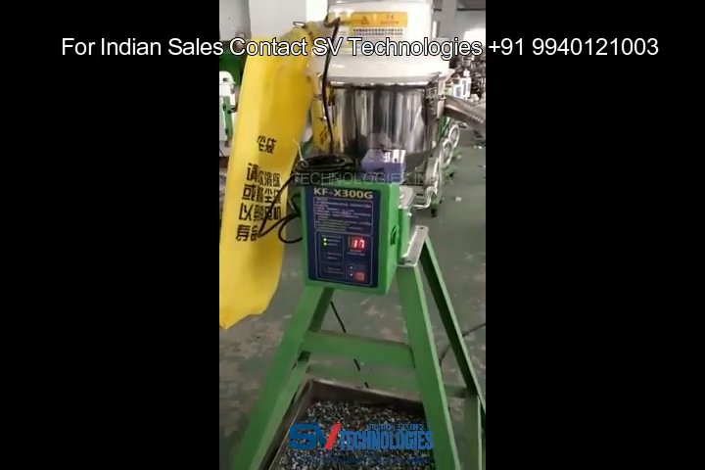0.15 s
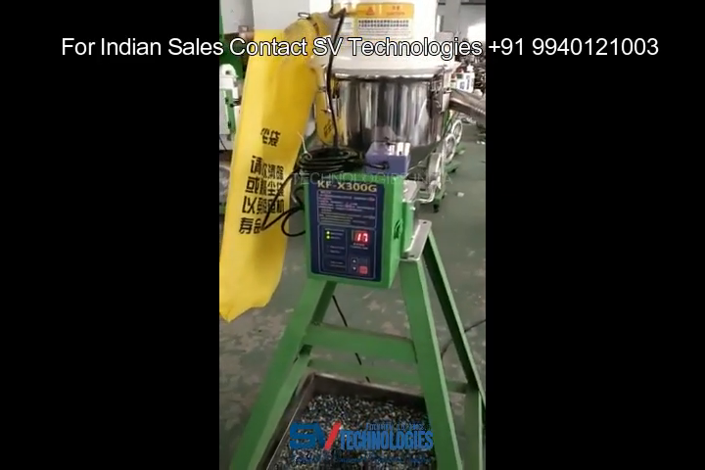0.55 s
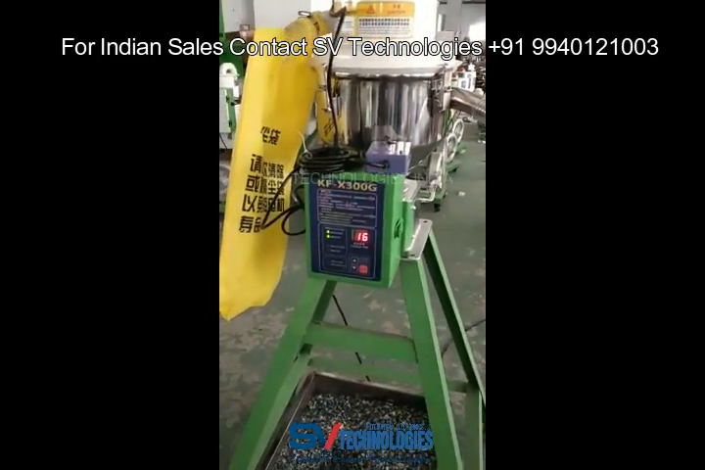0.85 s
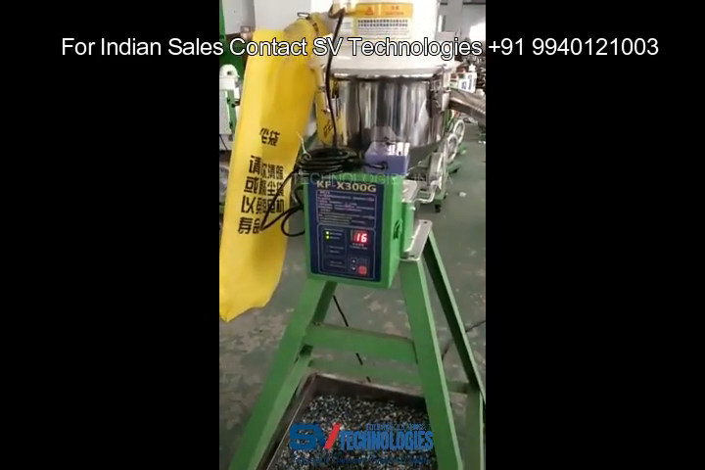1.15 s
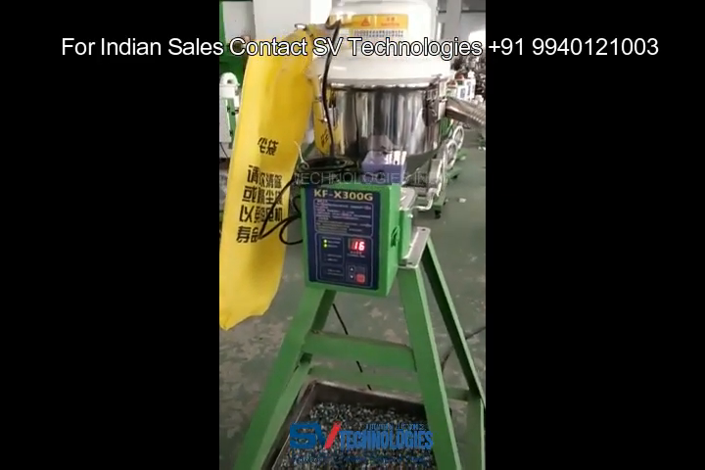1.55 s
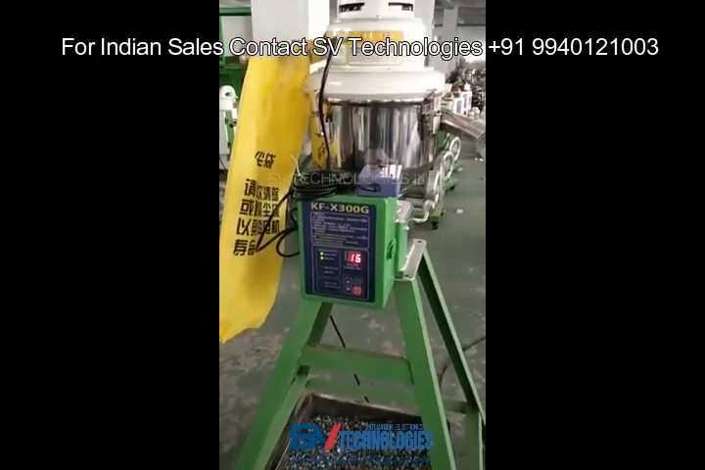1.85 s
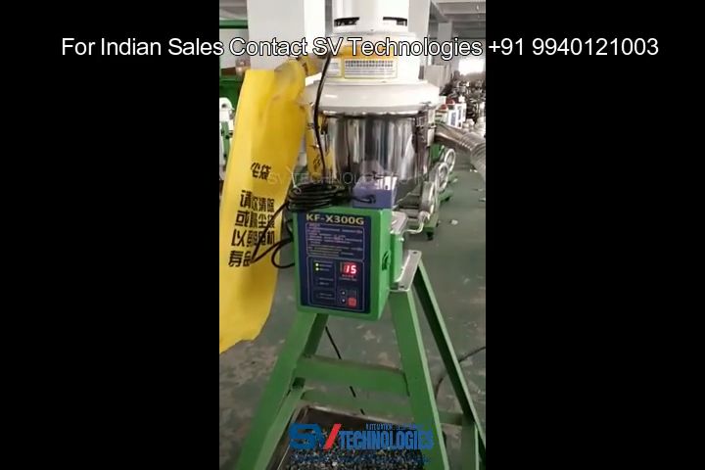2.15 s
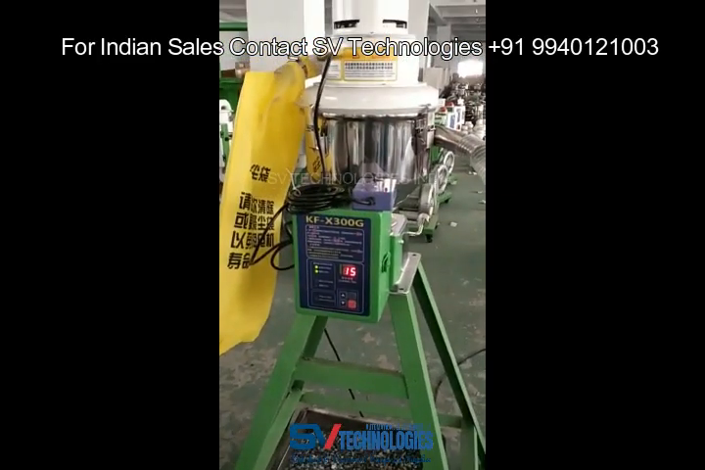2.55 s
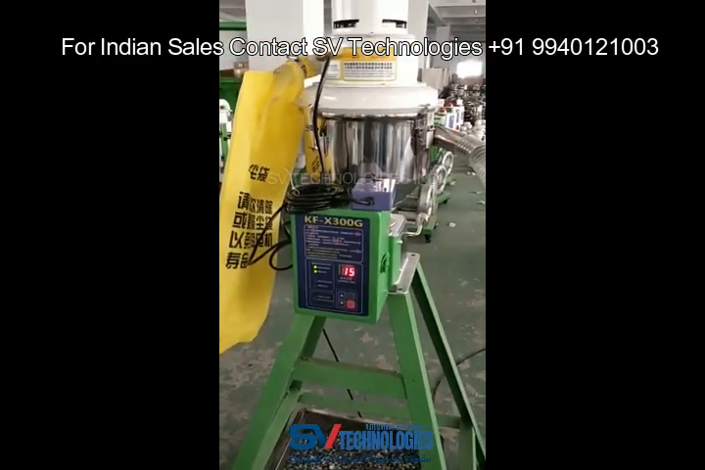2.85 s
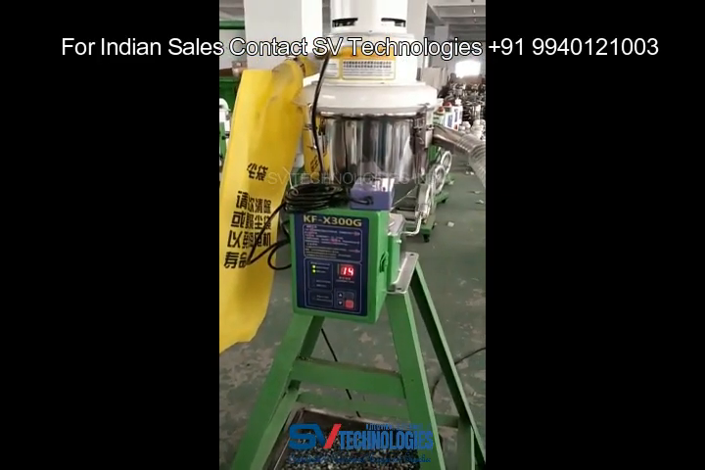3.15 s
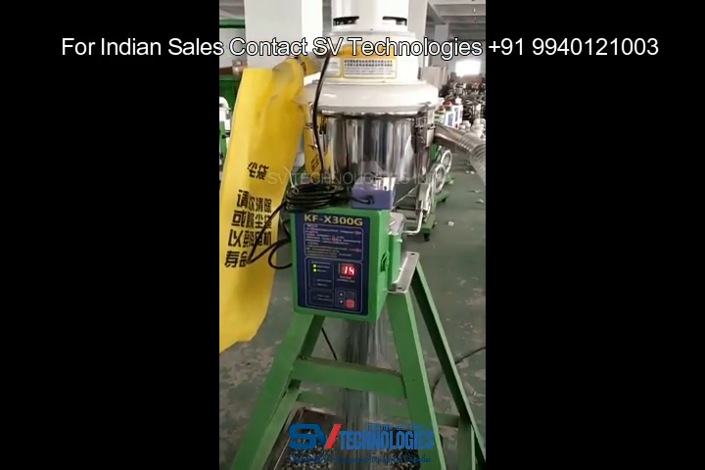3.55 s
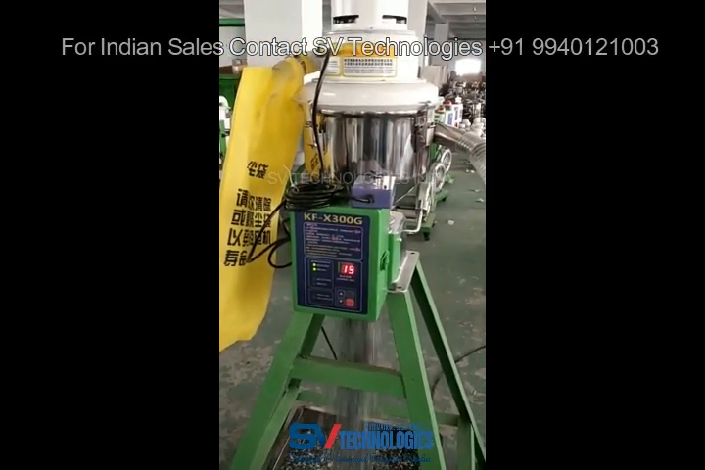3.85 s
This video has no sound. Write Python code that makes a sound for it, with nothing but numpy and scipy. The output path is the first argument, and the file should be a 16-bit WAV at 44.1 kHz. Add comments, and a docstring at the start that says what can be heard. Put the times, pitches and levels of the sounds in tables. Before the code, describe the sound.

Loud suction motor coasts to a stop, followed by a sudden clattering rush of plastic pellets

```python
"""The brushed motor of a vacuum loader coasts down in a factory hall, heard by two spaced phone microphones.
From the start, fan noise fades while sinusoids locked to the shaft, a tone and a slot whine, fall in pitch. At
3.3 s, with the suction gone, the flap opens and plastic granules pour into a bin below: random impacts excite
its resonances, and hard knocks join them from 3.7 s. Filtered noise gives the hall's steady murmur, hum and
faint whistle throughout, and a low rumble swells beneath them."""
import sys
import numpy as np
from scipy import signal
from scipy.fft import rfft, irfft, next_fast_len
from scipy.io import wavfile
from scipy.ndimage import map_coordinates

SR = 44100
rng = np.random.default_rng(int(sys.argv[2]) if len(sys.argv) > 2 else 0)


def boost(x):
    """Linear amplitude factor 10**(x/20) for a level x in decibels (scalar or array-like)."""
    u = np.asarray(x, float) / 20
    return 10 ** u


def dump_mix(stems):
    """Bounce the given channels to the path in sys.argv[1] as a 16-bit WAV at rate SR."""
    frames = np.atleast_2d(stems).T  # one column per channel
    limited = np.clip(frames, -1, 1)  # hard clip at full scale
    pcm = np.round(limited * 32767).astype(np.int16)
    wavfile.write(sys.argv[1], SR, pcm)


N = 176400  # samples
SIZE = next_fast_len(N + SR)
HZ = np.maximum(np.arange(SIZE // 2 + 1) * SR / SIZE, 1)
TIME = np.arange(N) / SR

# Coasting shaft: initial turns per s; drag = friction + viscous * speed + air * speed^2
START_HZ, FRICTION, VISCOUS, AIR = 180.34, 20.08, .0854, .0020465
SLOTS = 22  # per shaft turn
FLICKER_DB, TONE_ROOM_DB = 3, -11
MOTOR_LAG_S = 0.0002  # left after right

# Shaft tone, shaking the frame while it passes the frame's resonance: (time [s], level [dB])
SHAFT_LEVEL = [(0, -43), (.05, -34), (.23, -41.5), (.37, -51.5), (.6, -64), (1, -71), (4, -107)]
# Slot whine: (time [s], level [dB])
WHINE_LEVEL = [(0, -50), (.17, -43), (.3, -52), (.4, -48), (.55, -51), (.65, -46), (.82, -43), (.97, -44),
               (1.04, -48), (1.11, -39), (1.2, -43), (1.24, -50), (1.33, -43), (1.42, -48), (1.48, -40),
               (1.55, -45), (1.62, -54), (2.0, -59), (2.2, -62), (2.65, -65), (2.82, -78), (2.92, -51),
               (2.99, -50), (3.07, -63), (3.22, -53), (3.4, -64), (3.5, -85), (4, -90)]
# Overtones of the whine: (multiple of the slot rate)
OVERTONE_RATIOS = [1.5, 2, 3, 4]
# Their mean levels: (time [s], level [dB] at 1.5, 2, 3 and 4 times the slot rate)
OVERTONE_LEVELS = [(0, -66, -60, -75, -85), (.65, -70, -60, -75, -85), (.82, -70, -55, -70, -85),
                   (1.0, -72, -62, -63, -80), (1.4, -72, -68, -64, -76), (1.55, -72, -66, -57, -76),
                   (1.7, -70, -66, -60, -74), (1.85, -56, -64, -66, -63), (2.02, -59, -55, -68, -70),
                   (2.2, -62, -60, -69, -62), (2.32, -76, -56, -64, -74), (2.75, -76, -59, -67, -72),
                   (2.9, -76, -68, -64, -72), (2.99, -78, -60, -47, -70), (3.08, -78, -61, -54, -61),
                   (3.16, -80, -72, -68, -66), (4, -85, -80, -78, -80)]
# Nearby reflections turn the phase of the tones between the microphones: (frequency [Hz], left lead [rad])
TONE_PHASE = [(1500, 0), (1800, .9), (1930, .7), (2000, 3.2), (2080, 3), (2200, .9), (2450, 1), (2600, -1),
              (3000, -1), (3350, -1.5), (3700, -1.3), (4500, 0)]

# Fan roar before its puffs, flicker and change of colour: (time [s], level [dB])
ROAR_LEVEL = [(0.0, -25.5), (0.02, -28), (1.24, -41), (1.37, -42.5), (1.41, -42.5), (1.48, -44),
              (1.53, -43), (2.51, -51.5), (3.03, -51), (3.25, -49)]
# Colour of the roar at full speed: (frequency [Hz], relative density [dB per Hz])
ROAR_SPECTRUM = [(120, -17.5), (200, -7), (333, -9.5), (469, -13), (768, -1.7), (1010, -9), (1570, -1),
                 (2410, -4), (2710, -2.5), (4440, -4), (5500, -2.5), (6360, 1.5), (7500, -5), (8000, -16),
                 (9500, -17), (10800, -19), (11700, -38), (15300, -60), (22000, -120)]
# Loss of the roar per halving of speed, negative for gain: (frequency [Hz], loss [dB])
ROAR_SPEED_LOSS = [(200, -3), (800, -2.5), (2500, 1.66), (5000, 2), (7000, 5.5), (11000, 3.5)]
# Brief puffs in the roar, full from 6 kHz up and weaker below: (time [s], level [dB] above the roar)
ROAR_PUFFS = [(.87, 6), (.98, 0.5), (1.6, 0.5), (2.92, 10.5), (3.22, 7)]
PUFF_S = 0.017  # from the peak to 1/e of its rise in dB
ROAR_PATCHY_DB, ROAR_DIFFUSE, ROAR_ROOM_DB = 3, 0.26, 0.5  # diffuse: share of power

# Granule stream: (time [s], level [dB], weight of the sound below BIN_LOW_HZ [dB] relative to its mean)
POUR_LEVEL = [(3.3, -51, -11), (3.32, -52, -22), (3.355, -39, -15), (3.4, -25, -15), (3.42, -25.5, -20),
              (3.43, -28.5, -22.5), (3.55, -32, -15.5), (3.6, -28, -14.5), (3.65, -27.5, -20.5),
              (3.7, -25, -16), (3.76, -23, -21), (3.8, -27.5, -20.5), (3.82, -26, -11.5), (3.845, -28, -21),
              (3.87, -30.5, -34), (3.92, -27, -10), (3.96, -27, -17.5), (4.0, -28, -16)]
# Clumps landing as short bursts: (time [s], peak level [dB] before the offset LUMP_DB)
LUMP_PEAKS = [(3.3227, -19.5), (3.3553, -17.5), (3.6026, -16), (3.65, -19.5), (3.814, -19.5),
              (3.9206, -18.5)]
# Short hard hits on the bin: (time [s], peak level [dB] before the offset KNOCK_DB)
KNOCK_PEAKS = [(3.7242, -16), (3.7266, -16), (3.7374, -22), (3.7449, -13), (3.766, -15), (3.7897, -24),
               (3.796, -15.5), (3.809, -21), (3.8235, -23), (3.8749, -8.5), (3.898, -19.5), (3.9056, -20)]
LUMP_S, LUMP_DB, KNOCK_S, KNOCK_DB = 0.009, -11, .0015, -2  # decay times and level offsets
# Colour of the grain impacts: (frequency [Hz], relative density [dB per Hz])
GRAIN_SPECTRUM = [(410, -45), (900, -24), (1150, -11), (1500, -6), (1750, -7), (1950, -8), (2700, -6),
                  (3200, -11), (3650, -3), (4700, -4), (5520, -9), (6300, -6), (7300, -6), (8340, -15),
                  (10400, -14), (11700, -33), (15300, -58), (22000, -120)]
# Resonances of the bin: (frequency [Hz], width [Hz], relative level [dB])
BIN_MODES = [(1560, 90, -6), (1930, 40, -5), (2260, 80, 4.5), (2900, 370, -4.5), (3560, 130, -4),
             (3780, 90, -6), (3950, 80, -6), (4250, 120, -3), (4690, 150, 0), (5140, 120, -17),
             (6020, 330, -10.5), (7000, 200, -14)]
# Low tones bend round the phone, which turns their phase: (frequency [Hz], left lead [rad])
PHONE_BEND = [(600, -0.78), (800, -0.12), (1120, 0.2), (1500, 1), (2000, -0.26)]
GRAINS_PER_S, GRAIN_SPREAD_DB, CLUMP_DB = 4000, 2.8, 1.2
BIN_DB, BIN_LOW_HZ, RING_WANDER_DB = 1.5, 2700, 2.5  # ring over ticks, crossover, wander of each mode
POUR_LAG_S, POUR_LAG_SPREAD_S, POUR_ROOM_DB = -0.0003, .00003, -10  # right after left

# Colour of the steady hall noise: (frequency [Hz], relative density [dB per Hz])
HALL_SPECTRUM = [(15, -56), (40, -32), (65, -6.5), (150, -7), (458, -19), (828, -24), (2150, -12),
                 (2570, -10), (3880, -22), (5150, -15), (7600, -24), (8100, -36), (10800, -40.5),
                 (11700, -90), (15300, -81), (22000, -120)]
# Breathy whistle: (time [s], level [dB])
WHISTLE_LEVEL = [(0, -62), (1.3, -58), (1.6, -54), (2.3, -56), (3, -60), (4, -66)]
# Rumble: (time [s], level [dB])
RUMBLE_LEVEL = [(0, -84), (1, -79), (2, -72), (2.7, -69), (4, -63)]
HALL_DB, HUM_DB, HUM_HZ, HUM_WIDTH_HZ = -52.5, -58, 67.1, 12.5
WHISTLE_HZ, WHISTLE_WIDTH_HZ, RUMBLE_HZ, RUMBLE_WIDTH_HZ = 5140, 200, 47.3, 30
ROOM_T60_S, ALIKE_BELOW_HZ = .4, 440
# Unequal microphones, the right one duller: (frequency [Hz], left minus right [dB])
MICROPHONE_DIFFERENCE = [(60, 1), (430, -0.3), (900, -2), (1600, -0.8), (3000, 0.3), (5000, 2),
                         (6500, -0.5), (7500, 8), (9000, 8), (11500, 9)]


def rms_one(x):
    """Normalisation to unit rms."""
    return x / np.sqrt(np.mean(x ** 2) + 1e-20)


def in_time(rows):
    """Linear interpolation of each table column over time."""
    s, *columns = np.transpose(rows)
    return [np.interp(TIME, s, c) for c in columns]


def at_hz(points, hz):
    """Interpolation of a spectrum on a logarithmic frequency axis."""
    points = np.array(points)
    return np.interp(np.log(hz), np.log(points[:, 0]), points[:, 1])


def shaped(x, gain):
    """Linear filtering: the spectrum is multiplied by a gain per frequency."""
    return irfft(rfft(x, SIZE) * gain, SIZE)[..., :N]


def drift(rate):
    """Slow random modulation: a cubic spline through normal draws, 2 * rate of them per second."""
    knots = rng.standard_normal(400)
    return map_coordinates(knots, [TIME * rate * 2 + 2], order=3)


def resonance(x, hz, width_hz):
    """Damped resonance: a two-pole filter of about unit gain at its peak."""
    r = np.exp(-np.pi * width_hz / SR)
    poles = [1, -2 * r * np.cos(2 * np.pi * hz / SR), r * r]
    return signal.lfilter([(1 - r * r) / 2, 0, (r * r - 1) / 2], poles, x)


def decay(start_s, fall_s):
    """Exponential decay from a sudden onset."""
    return np.exp(-np.maximum(TIME - start_s, 0) / fall_s) * (TIME >= start_s)


def between_ears(phase):
    """Interaural phase: half the turn as lead on the left, half as lag on the right."""
    return np.exp(np.array([[.5j], [-.5j]]) * phase)


def unalike(pair):
    """Spatial coherence of a diffuse field: shared bass, independent treble."""
    low = 1 / (1 + (HZ / ALIKE_BELOW_HZ) ** 4)
    mid, side = shaped(pair, np.sqrt([1 + low, 1 - low]) / np.sqrt(2))
    return np.array([mid + side, mid - side])


def placed(x, lag_s, room_db):
    """Arrival-time difference of the direct sound, plus an exponentially decaying reverberant tail."""
    decaying = boost(-60 * TIME / ROOM_T60_S) * (TIME > .004)
    tail = unalike(rng.standard_normal((2, N)) * decaying)
    tail = boost(room_db) * tail / np.sqrt((tail ** 2).sum(1).mean())
    direct = np.exp(-1j * np.pi * HZ * lag_s * np.array([[1], [-1]]))
    return shaped(x, (direct + rfft(tail, SIZE)) / np.sqrt(1 + boost(2 * room_db)))


def speed():
    """Rotational deceleration: turns per second, the closed solution for quadratic drag."""
    d = np.sqrt(4 * FRICTION * AIR - VISCOUS ** 2)
    start_angle = np.arctan((2 * AIR * START_HZ + VISCOUS) / d)
    return (d * np.tan(start_angle - d * TIME / 2) - VISCOUS) / (2 * AIR)


def tones(turns):
    """Phase locking to rotation: shaft tone, slot whine and its flickering overtones."""
    angle = 2 * np.pi * np.cumsum(turns) / SR
    shaft = boost(in_time(SHAFT_LEVEL)[0]) * np.sin(angle)
    whine = boost(in_time(WHINE_LEVEL)[0]) * np.sin(SLOTS * angle)
    upper = 0
    for ratio, db in zip(OVERTONE_RATIOS, in_time(OVERTONE_LEVELS)):
        upper = upper + boost(db + FLICKER_DB * drift(12)) * np.sin(ratio * SLOTS * angle)
    return np.sqrt(2) * (shaft + whine + upper)  # levels are rms


def roar(turns):
    """Broadband flow noise, direct and diffuse: its bands flicker and change balance as the fan slows."""
    direct = placed(rng.standard_normal(N), MOTOR_LAG_S, ROAR_ROOM_DB)
    diffuse = unalike(rng.standard_normal((2, N)))
    white = np.sqrt(1 - ROAR_DIFFUSE) * direct + np.sqrt(ROAR_DIFFUSE) * diffuse
    noise = rfft(rms_one(shaped(white, boost(at_hz(ROAR_SPECTRUM, HZ)))), SIZE)
    halvings = np.log2(START_HZ / turns)
    puff_db = sum(db * np.exp(-((TIME - s) / PUFF_S) ** 2) for s, db in ROAR_PUFFS)
    centres = np.geomspace(200, 11000, 48)
    out = 0
    for k, hz in enumerate(centres):
        # overlapping triangular bands that add up to one
        weight = np.interp(np.log(HZ), np.log(centres), np.arange(len(centres)) == k)
        band = irfft(noise * weight, SIZE)[:, :N]
        flicker_db = ROAR_PATCHY_DB * drift(4.003) + puff_db * min(hz / 6000, 1)
        out = out + band * boost(flicker_db - halvings * at_hz(ROAR_SPEED_LOSS, hz))
    return out * boost(in_time(ROAR_LEVEL)[0])


def granules():
    """Impact excitation of resonators: dense uneven clicks, clumps and knocks make the bin ring."""
    flow_db, low_db = in_time(POUR_LEVEL)
    strength = boost(flow_db + CLUMP_DB * drift(40)) * (TIME > POUR_LEVEL[0][0])
    for s, db in LUMP_PEAKS:
        strength = strength + boost(db + LUMP_DB) * decay(s, LUMP_S)
    sizes = boost(GRAIN_SPREAD_DB * np.minimum(rng.exponential(1, N), 4)) * rng.choice([-1, 1], N)
    clicks = rms_one(sizes * (rng.random(N) < GRAINS_PER_S / SR))
    force = clicks * strength
    for s, db in KNOCK_PEAKS:
        force = force + boost(db + KNOCK_DB) * decay(s, KNOCK_S) * np.sign(sizes)

    lags_s = POUR_LAG_S + POUR_LAG_SPREAD_S * rng.standard_normal(N)
    later = np.clip(np.arange(N) - lags_s * SR, 0, N - 2)
    whole, part = later.astype(int), later % 1

    def pair(x):
        """Scattered path lengths: each grain reaches the right microphone with a lag of its own."""
        right = np.bincount(whole, x * (1 - part), N) + np.bincount(whole + 1, x * part, N)
        return np.array([x, right]) + 1e-18

    ticks = shaped(pair(force), boost(at_hz(GRAIN_SPECTRUM, HZ)))
    rings = 0
    for hz, width, db in BIN_MODES:
        dealt = force * rng.uniform(0, 1, N)
        # each resonance swells and fades as the heap shifts
        gain = boost(db + RING_WANDER_DB * drift(14)) / np.sqrt(width)
        rings = rings + gain * resonance(pair(dealt), hz, width)
    out = rms_one(ticks) + boost(BIN_DB) * rms_one(rings)
    out = out * np.std(force) / np.sqrt(1 + boost(2 * BIN_DB))
    low = 1 / (1 + (HZ / BIN_LOW_HZ) ** 6)
    lean = boost(low_db - low_db.mean())
    return shaped(out * lean, low * between_ears(at_hz(PHONE_BEND, HZ))) + shaped(out, 1 - low)


def background():
    """Filtered noise: a steady murmur, with resonances for wavering hum, swelling rumble and whistle."""
    noise = unalike(shaped(rng.standard_normal((2, N)), boost(at_hz(HALL_SPECTRUM, HZ))))
    hum = resonance(rng.standard_normal(N), HUM_HZ, HUM_WIDTH_HZ)
    hum = resonance(hum, HUM_HZ, HUM_WIDTH_HZ)
    whistle = resonance(rng.standard_normal((2, N)), WHISTLE_HZ, WHISTLE_WIDTH_HZ)
    rumble = resonance(rng.standard_normal(N), RUMBLE_HZ, RUMBLE_WIDTH_HZ)
    rumble = resonance(rumble, RUMBLE_HZ, RUMBLE_WIDTH_HZ)
    steady = boost(HALL_DB) * rms_one(noise) + boost(HUM_DB) * rms_one(hum)
    whistle = boost(in_time(WHISTLE_LEVEL)[0]) * rms_one(whistle)
    return steady + whistle + boost(in_time(RUMBLE_LEVEL)[0]) * rms_one(rumble)


def scene():
    """Superposition: motor to the right, granules to the left, background all round."""
    turns = speed()
    motor_tones = placed(tones(turns), MOTOR_LAG_S, TONE_ROOM_DB)
    motor = shaped(motor_tones, between_ears(at_hz(TONE_PHASE, HZ))) + roar(turns)
    pour = placed(granules(), 0, POUR_ROOM_DB)  # the grains carry their own lags
    return motor + pour + background()


def low_pass(x):
    """Removes everything above the highest recorded frequency."""
    return signal.sosfilt(signal.butter(12, 11890, fs=SR, output="sos"), x)


def record(dry):
    """Frequency response: the difference between the microphones is split evenly over both."""
    tilt_db = at_hz(MICROPHONE_DIFFERENCE, HZ) / 2
    mix = shaped(dry, boost(np.array([tilt_db, -tilt_db])))
    return low_pass(mix)


dry = scene()
out = record(dry)
dump_mix(out)
```